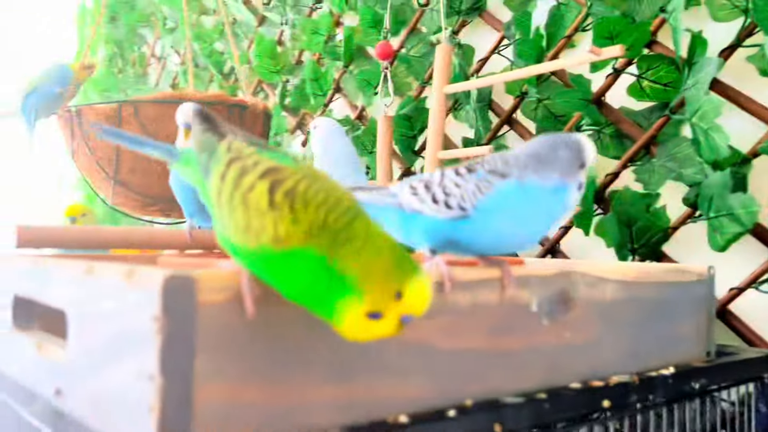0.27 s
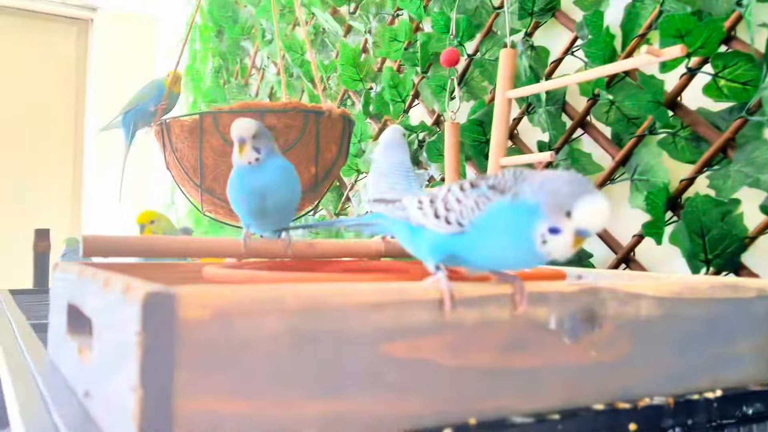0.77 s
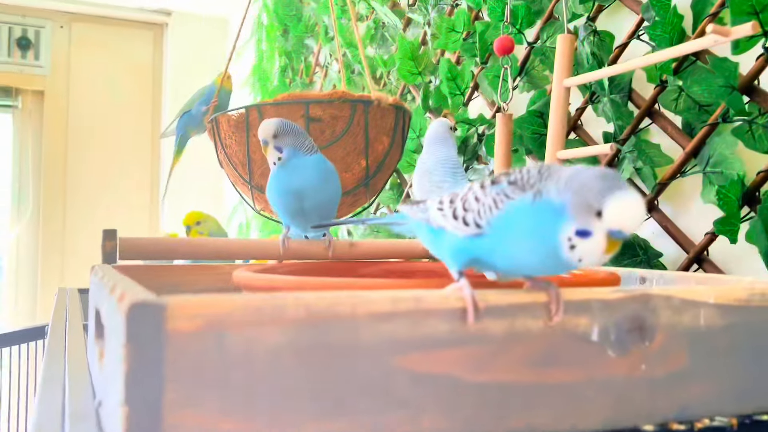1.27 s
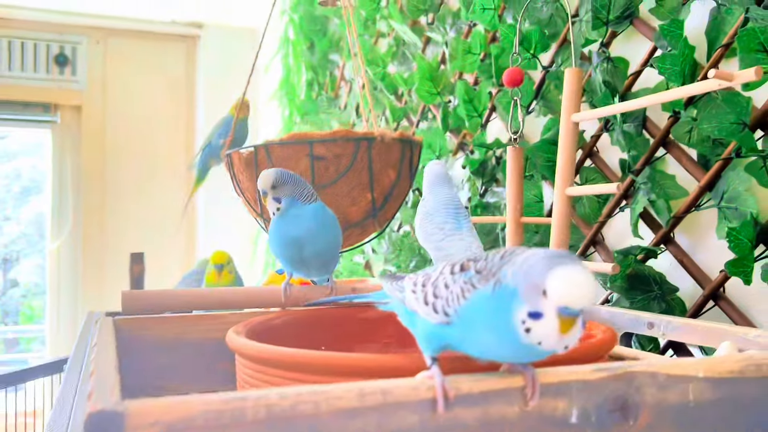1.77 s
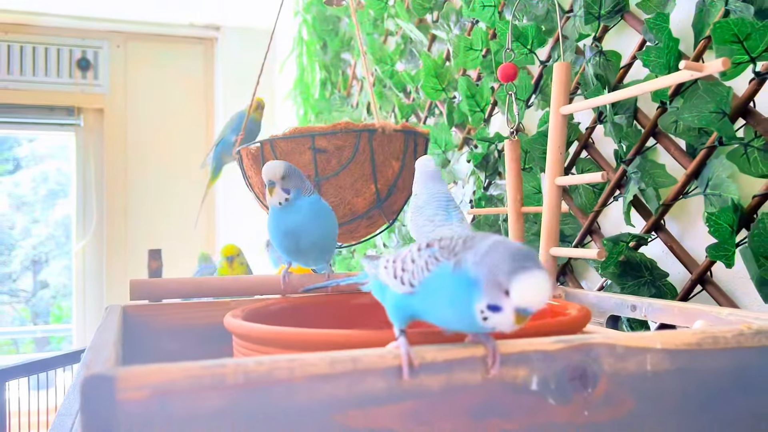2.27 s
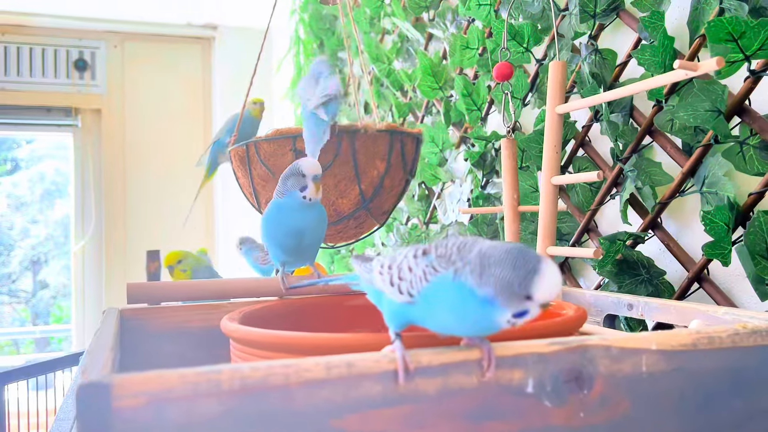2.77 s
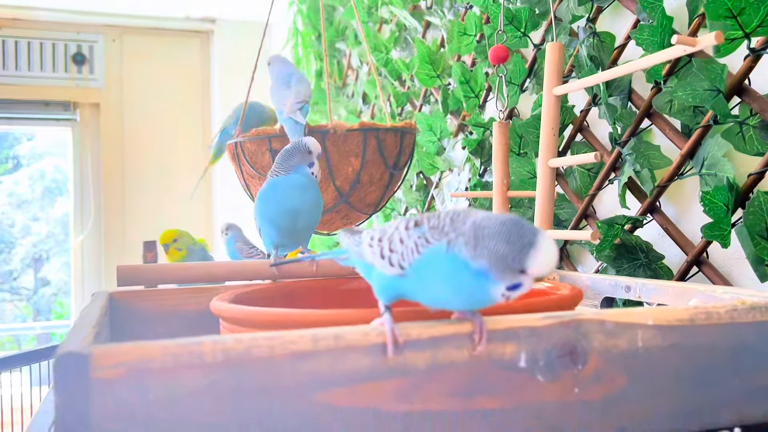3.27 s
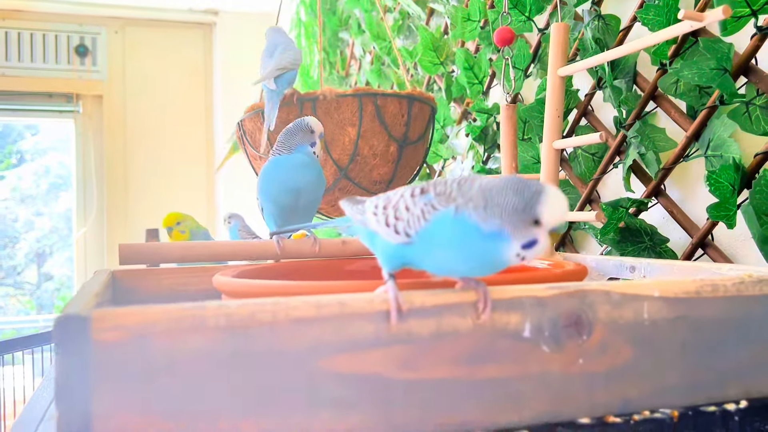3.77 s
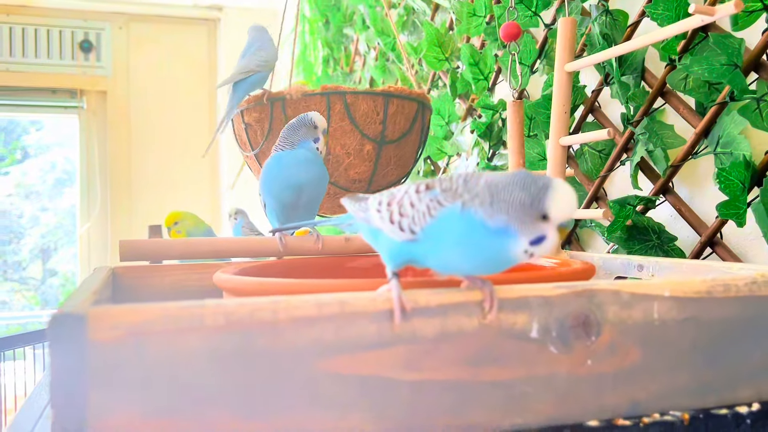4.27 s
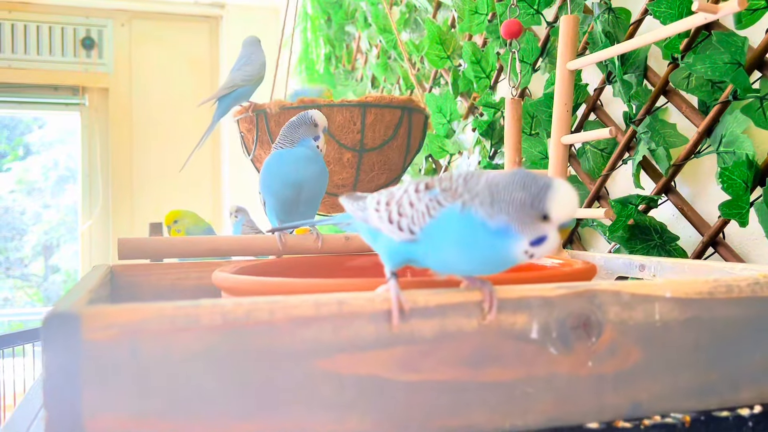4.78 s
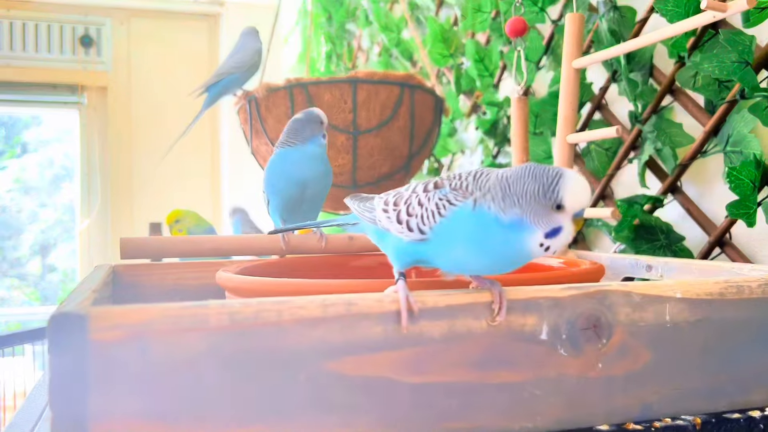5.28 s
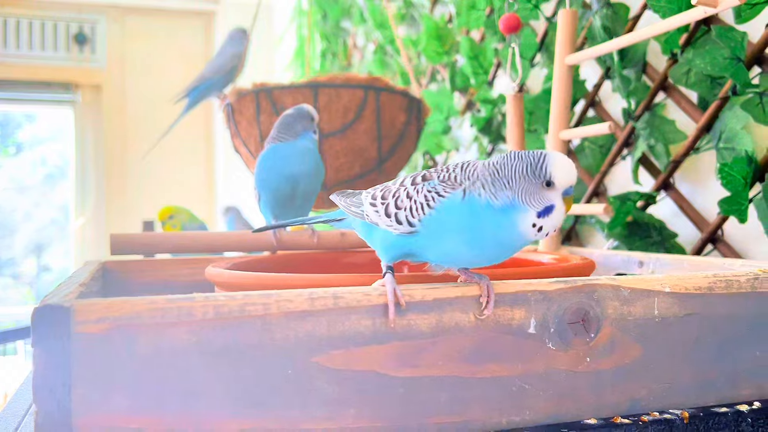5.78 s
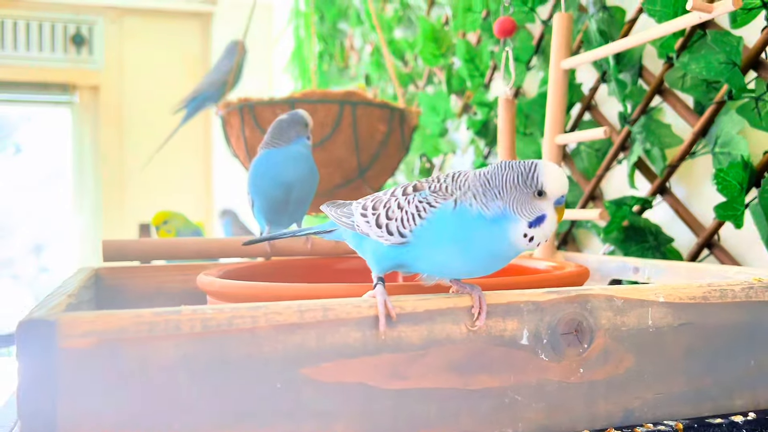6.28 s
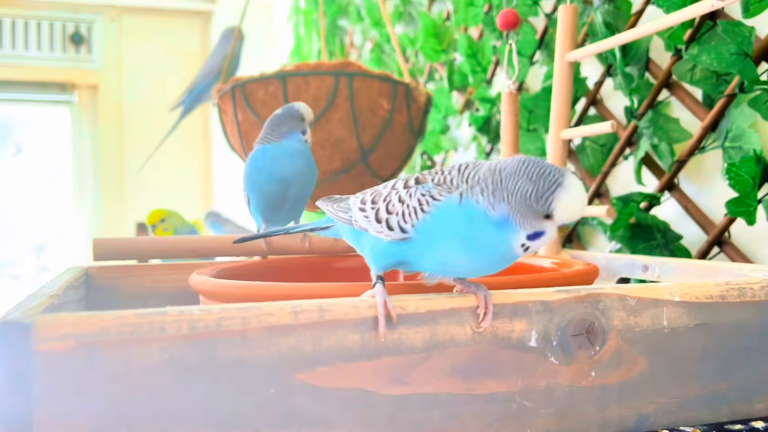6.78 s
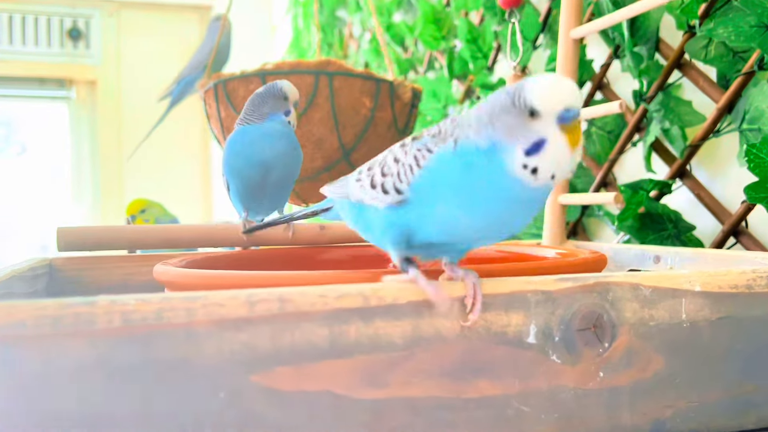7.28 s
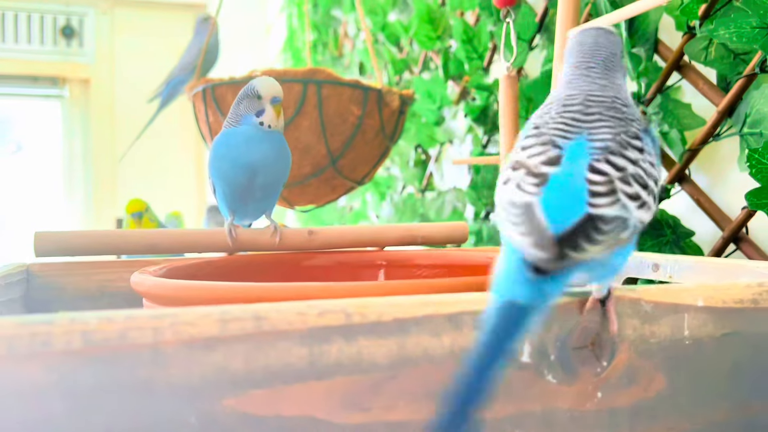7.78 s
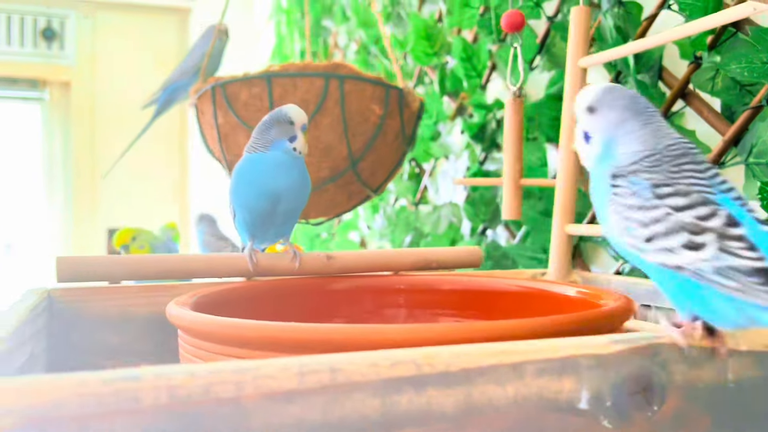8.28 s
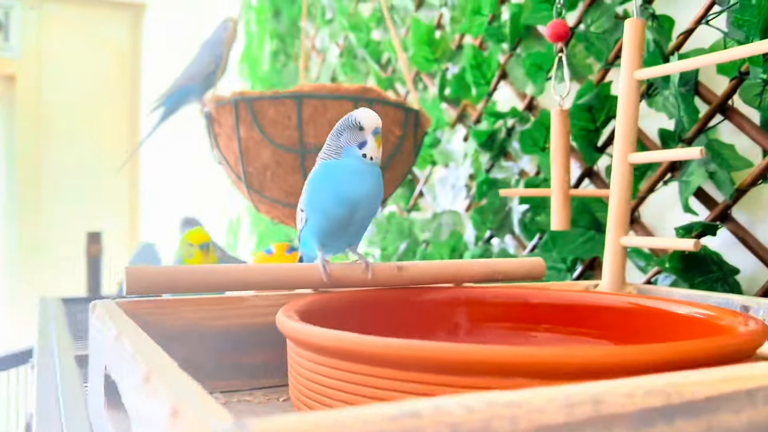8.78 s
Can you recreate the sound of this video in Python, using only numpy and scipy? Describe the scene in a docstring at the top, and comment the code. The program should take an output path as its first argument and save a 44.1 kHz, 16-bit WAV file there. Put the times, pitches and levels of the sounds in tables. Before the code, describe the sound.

Several budgerigars call close by in a small, lightly reverberant room. Quick peeps and a hoarse churr mix with grainy rustling gusts and low buffeting, which stop just before three seconds. Harsh rasps then stand out over sparser chirps and faint chatter, a low mutter joins from the middle, and the calls grow dense and loud toward the end. Soft ventilation rumble and a few perch taps lie underneath.

```python
"""Peeps, a hoarse churr and rustling gusts open the scene: a flock of budgerigars in a small room. Gliding sine
whistles with overtones alternate with harsh rasps, puffs of buzz rung through a throat. The gusts, early on,
are grainy noise in flaring bands; scuffs, taps and bumps are short coloured noise. Fainter strokes chatter
behind, and a low mutter joins later, over ventilation rumble and hum. The two channels differ in phase,
unevenly across frequency."""
import sys
import numpy as np
from scipy import signal
from scipy.fft import rfft, irfft
from scipy.io import wavfile
from scipy.ndimage import map_coordinates

SR = 44100
rng = np.random.default_rng(int(sys.argv[2]) if len(sys.argv) > 2 else 0)


def bounce(signal):
    """Save signal as a 16-bit WAV file at the path given by the first command-line argument."""
    frames = np.transpose(np.atleast_2d(signal))
    limited = np.clip(frames, -1, 1)
    pcm = np.round(limited * 32767).astype(np.int16)
    wavfile.write(sys.argv[1], SR, pcm)


N = 398663
TIME = np.arange(N) / SR
FREQS = np.arange(N // 2 + 1) * SR / N
SIDES = np.array([[1], [-1]])  # sign of a side signal at the left and right port


def amp(db):
    """Decibels to gain."""
    return 10 ** (np.asarray(db) / 20)


def unit(x):
    """Scale to rms 1."""
    return x / np.sqrt(np.mean(x ** 2) + 1e-18)


def add(track, s, x):
    """Mix a sound into a track at time s."""
    i = max(int(s * SR), 0)
    track[i:i + len(x)] += x[:max(N - i, 0)]


def colour(x, points, tilt=lambda hz: 0):
    """Filter by (Hz, dB) points plus an optional dB function of frequency; rms 1."""
    hz = np.maximum(np.fft.rfftfreq(len(x), 1 / SR), 1)
    at_hz, db = np.transpose(points)
    gain = amp(np.interp(np.log(hz), np.log(at_hz), db) + tilt(hz))
    return unit(irfft(rfft(x) * gain, len(x)))


def wander(size, rate_hz):
    """Smooth random motion with about rate_hz turns a second and spread near 1."""
    steps = np.arange(size) / SR * rate_hz
    points = rng.standard_normal(int(steps[-1]) + 3)
    return map_coordinates(points, [steps + 1], order=3, mode="nearest")


def swell(t, length, edge):
    """Envelope that opens around 0 and closes around length, each over edge seconds."""
    opening = np.clip(np.minimum(t, length - t) / edge + .5, 0, 1)
    return np.sin(np.pi / 2 * opening) ** 2


# Spectrum of the room rumble. Each row: frequency in Hz, relative level in dB.
RUMBLE_COLOUR = [(20, -13), (45, -6.5), (100, 0), (140, -10), (220, -9.5), (400, -19), (700, -24),
                 (2000, -15), (15000, -53.5)]


def room_tone(floor_db=-64, rumble_swell_db=2, hum_hz=72, hum_db=-70, side_db=-9):
    """Low ventilation rumble that swells a little, with a hum wavering in pitch and level."""
    mid, side = (colour(rng.standard_normal(N), RUMBLE_COLOUR) * amp(rumble_swell_db * wander(N, 27))
                 for _ in range(2))
    rumble = mid + amp(side_db) * side * SIDES
    hum_phase = 2 * np.pi * np.cumsum(hum_hz * (1 + 0.01 * wander(N, 11.0))) / SR
    hum = np.sqrt(2) * np.sin(hum_phase) * amp(2 * wander(N, 7.2))
    return amp(floor_db) * rumble + amp(hum_db) * hum


ROOM_T60_S, ROOM_TREBLE_T60_S = 0.33, 0.21


def room(x, early_db=-3, side_db=-3):
    """A few wall reflections, then a short diffuse tail whose treble dies first; partly alike at both ports."""
    t = np.arange(SR // 2) / SR
    split = signal.butter(2, 5000, fs=SR, output="sos")
    wet = []
    for _ in range(2):
        noise = rng.standard_normal(len(t))
        low = signal.sosfiltfilt(split, noise)
        tail = low * amp(-60 * t / ROOM_T60_S) + (noise - low) * amp(-60 * t / ROOM_TREBLE_T60_S)
        tail = tail * (t > .004)
        sparse = rng.standard_normal(len(t)) * (rng.random(len(t)) < .02)
        early = sparse * (t > .002) * np.exp(-t / 0.0038)
        response = unit(unit(tail) + amp(early_db) * unit(early)) / np.sqrt(len(t))
        wet.append(signal.fftconvolve(x, response)[:N])
    return wet[0] + amp(side_db) * wet[1] * SIDES


STIR_END_S, STIR_DB = 2.86, -55.5  # all rustling and buffeting ends here; a soft rustle lies under the gusts
# Rustling gusts. Each row: peak time in s, rise in s, fall in s, level in dB before the trim.
RUSTLES = [(0.2, 0.29, 0.99, -55), (0.625, 0.027, 0.19, -49.5), (1.04, 0.07, 0.12, -52.5),
           (1.215, 0.15, 0.085, -38), (1.41, 0.021, 0.096, -35.5), (1.79, 0.11, 0.14, -33),
           (1.92, 0.058, 0.023, -37), (2.025, 0.034, 0.027, -40.5), (2.087, 0.042, 0.048, -32),
           (2.3, 0.12, 0.037, -46.5), (2.54, 0.052, 0.082, -89)]
RUSTLE_TRIM_DB = -1
RUSTLE_DROP_DB = 17.5  # one rise before the peak and one fall after it
PULSE_HZ, PULSE_DB = 21.3, 3  # mean pulsing rate, level swing each way
# Spectrum of the rustle. Each row: frequency in Hz, relative level in dB.
RUSTLE_COLOUR = [(200, -25.5), (800, -13.5), (1700, 4.5), (3500, 7.5), (6500, 4.5), (9000, -6),
                 (16000, -15.5)]
# Low buffeting. Each row: time in s, level in dB.
BUFFETING = [(0.0, -59.5), (0.51, -60.5), (0.7, -43.5), (1.15, -54), (1.71, -51.5), (1.76, -67),
             (1.92, -39.5), (2.19, -73), (2.25, -55), (2.41, -83.5), (2.51, -64), (2.88, -80)]
# Spectrum of the buffeting. Each row: frequency in Hz, relative level in dB.
BUFFETING_COLOUR = [(20, -17), (75, 8), (130, -8.5), (430, -14), (700, -25), (1500, -43.5)]


def rustle(flutter_db=1, grain_db=2.0, band_db=3.5, side_db=-11):
    """Rustling gusts, as of a hand rubbing the phone: grainy noise in flaring bands, and low buffeting."""
    gusts = amp(STIR_DB)
    for s, rise, fall, db in RUSTLES:
        distance = np.maximum((s - TIME) / rise, (TIME - s) / fall)
        gusts = gusts + amp(db + RUSTLE_TRIM_DB - RUSTLE_DROP_DB * distance ** 2)
    flutter = amp(flutter_db * wander(N, 60)) * swell(TIME, STIR_END_S, 0.02)

    grains = rfft(rng.standard_normal(N) * amp(grain_db * wander(N, 700)))
    band = (FREQS // 1100).astype(int) % 6  # 1100 Hz strips dealt out to six groups
    flares = sum(irfft(grains * (band == k), N) * amp(band_db * wander(N, 90)) for k in range(6))
    rubbing = colour(flares, RUSTLE_COLOUR)
    pulse_phase = 2 * np.pi * np.cumsum(PULSE_HZ * (1 + 0.185 * wander(N, 8.03))) / SR
    pulses = amp(PULSE_DB * np.sin(pulse_phase))

    mid, side = (colour(rng.standard_normal(N), BUFFETING_COLOUR) for _ in range(2))
    buffeting = mid + amp(side_db) * side * SIDES
    buffeting_level = amp(np.interp(TIME, *np.transpose(BUFFETING)))
    return flutter * pulses * rubbing * gusts, flutter * buffeting * buffeting_level


# Dull scuffs against furniture. Each row: start in s, length in s, level in dB.
SCUFFS = [(0.544, 0.054, -54.5), (0.737, 0.178, -52.5)]
# Spectrum of a scuff. Each row: frequency in Hz, relative level in dB.
SCUFF_COLOUR = [(100, -6), (280, 2), (450, -0.5), (800, -2), (2500, -23)]


def scuffs(catch_db=5, edge=0.007):
    """Something drags over wood, catching and slipping: noise of uneven level."""
    out = np.zeros(N)
    for s, length, db in SCUFFS:
        t = np.arange(-edge / 2, length + edge, 1 / SR)
        slips = rng.standard_normal(len(t)) * amp(catch_db * wander(len(t), 194.0))
        add(out, s - edge / 2, colour(slips, SCUFF_COLOUR) * swell(t, length, edge) * amp(db))
    return out


def strikes(rows, points, t60, trim_db):
    """Blows on damped wood: coloured noise bursts that decay exponentially, 60 dB in t60 seconds."""
    out, t = np.zeros(N), np.arange(SR // 5) / SR
    for s, db in rows:
        burst = colour(rng.standard_normal(len(t)), points)
        add(out, s, burst * amp(db + trim_db - 60 * t / t60))
    return out


# Soft bumps on furniture. Each row: time in s, level in dB before trim.
BUMPS = [(2.547, -46)]
# Spectrum of a bump. Each row: frequency in Hz, relative level in dB.
BUMP_COLOUR = [(30, -23), (90, 5), (450, -2), (2000, -53)]


def bumps():
    """Soft, low blows on the furniture."""
    return strikes(BUMPS, BUMP_COLOUR, t60=0.064, trim_db=-10)


# Feet and beaks striking perches, and one wing clap at 2.304 s. Each row: time in s, level in dB before trim.
TAPS = [(.66, -31), (2.304, -27.5), (3.517, -43.5), (4.249, -36), (5.304, -35), (7.283, -36.5)]
# Spectrum of a tap. Each row: frequency in Hz, relative level in dB.
TAP_COLOUR = [(150, -15.5), (700, 2.5), (1300, 12.5), (4500, 12.5), (15000, -27.5)]


def taps():
    """Bright, quickly damped blows on wooden perches, and a clap of wings."""
    return strikes(TAPS, TAP_COLOUR, t60=0.037, trim_db=-2.0)


THROAT_HZ, OVERTONE_DB = 3200, -22  # overtone level of a note at the throat resonance
OVERTONE_DB_PER_OCTAVE, OVERTONE_MAX_DB = 16, 2


def overtone(hz):
    """Octave overtone in dB: the lower a note lies under the throat resonance, the stronger."""
    return min(OVERTONE_DB + OVERTONE_DB_PER_OCTAVE * np.log2(THROAT_HZ / hz), OVERTONE_MAX_DB)


STROKE_S = 0.013  # length of a warble stroke
NOTE_EDGE_S = .008
HOARSE_PER_OCTAVE = .5
# Spectrum of rasps and of the scratch in whistles. Each row: frequency in Hz, relative level in dB.
RASP_COLOUR = [(200, -50.5), (600, -43.5), (1100, -21), (1800, -15.5), (2500, -4.5), (3500, 1.5), (4900, 3),
               (5600, 0.5), (7000, 0.5), (8300, -5), (11000, -17.5), (15500, -11)]


def whistle(length, start_hz, mid_hz, end_hz, overtone_db, jitter=0.023, flutter_db=4.0,
            third_db=-14, fourth_db=-20, hoarse=0.013, scratch_db=-30):
    """The syrinx membrane sweeps through an arc of pitch, trembling in pitch and strength."""
    t = np.arange(-NOTE_EDGE_S / 2, length + NOTE_EDGE_S / 2, 1 / SR)
    progress = np.clip(t / length, 0, 1)
    hz = np.polyval(np.polyfit([0, .5, 1], [start_hz, mid_hz, end_hz], 2), progress)
    hz = hz * (1 + jitter * wander(len(t), 440))
    phase = 2 * np.pi * np.cumsum(hz) / SR
    tone = np.sin(phase)
    # third and fourth partials are set relative to the second
    for k, db in enumerate([0, third_db, fourth_db], 2):
        tone += amp(overtone_db + db) * np.sin(k * phase) * (k * hz < SR / 2)
    # fast glides break up: irregular beating throws sidebands round the tone
    glide = abs(np.log2(end_hz / start_hz)) * min(STROKE_S / length, 1)
    tone = tone * (1 + (hoarse + HOARSE_PER_OCTAVE * glide) * wander(len(t), 1600))
    scratch = amp(scratch_db) * colour(rng.standard_normal(len(t)), RASP_COLOUR)
    flutter = unit(amp(flutter_db * wander(len(t), 244.3)))
    return (unit(tone) + scratch) * flutter * swell(t, length, NOTE_EDGE_S)


def far_chatter(notes, count=330, far_db=-48, spread_db=2, answer_s=0.032):
    """Birds further back answer each syllable with quick, mostly falling strokes."""
    out = np.zeros(N)
    for i, (long, high, fall, arch) in enumerate(rng.random((count, 4))):
        s, *_, db, _ = notes[i % len(notes)]
        hz = 2000 + 1600 * high
        end_hz = hz * (.55 + .55 * fall)
        mid_hz = end_hz + (hz - end_hz) * arch
        note = whistle(.01 + .016 * long, hz, mid_hz, end_hz, overtone(hz))
        # syllables under -40 dB get quieter answers
        level_db = far_db + min(db + 40.0, 0) + spread_db * rng.standard_normal()
        add(out, s + answer_s * rng.uniform(0, 1.8), note * amp(level_db))
    return out


MUTTER_FROM_S, MUTTER_HZ = 4, 1730  # start, centre of the pitch range
MUTTER_MIN_DB, MUTTER_RANGE_DB = -60.5, 6


def mutter(count=55, spread_octaves=0.195, glide_octaves=0.33, shortest_s=0.023, longest_s=0.024):
    """Soft low notes, mostly sinking, that follow each other closely to the end."""
    out = np.zeros(N)
    for i, (late, long, high, fall, loud) in enumerate(rng.random((count, 5))):
        hz = MUTTER_HZ * 2 ** (spread_octaves * (2 * high - 1))
        step = 2 ** (-glide_octaves * (fall - .2))
        length = shortest_s + (longest_s - shortest_s) * long
        note = whistle(length, hz / step, hz, hz * step, overtone(hz), third_db=-8, fourth_db=-21)
        s = MUTTER_FROM_S + (TIME[-1] - MUTTER_FROM_S) * (i + late) / count
        add(out, s, note * amp(MUTTER_MIN_DB + MUTTER_RANGE_DB * loud))
    return out


# Hoarse notes. Each row: start in s, length in s, pitch in Hz, level in dB.
CHURRS = [(0.191, 0.039, 2815, -36.5), (1.275, 0.096, 2897, -36.5), (2.472, 0.065, 2585, -46.5),
          (5.817, 0.074, 3200, -36), (6.007, 0.062, 2956, -49), (6.393, .075, 3015, -42.5),
          (7.088, 0.097, 3036, -43.5), (8.553, 0.069, 2750, -42)]
CHURR_HOARSE, CHURR_SHAKE = .5, .09  # beating depth, pitch jitter as a share


def churrs(half_db=-10, sag=0.0502):
    """Hoarse whistles that shake quickly in pitch, with a growl an octave below."""
    calls = []
    for s, length, hz, db in CHURRS:
        high, low = (whistle(length, f * (1 + sag), f, f * (1 - sag), overtone(f),
                             jitter=CHURR_SHAKE, hoarse=CHURR_HOARSE) for f in (hz, hz / 2))
        calls.append((s, (high + amp(half_db) * low) * amp(db)))
    return calls


# Nasal notes. Each row: start in s, length in s, start pitch in Hz, end pitch in Hz, level in dB,
# then second, third and fourth partial in dB relative to the first.
WHINES = [(6.318, .026, 2100, 1750, -52, -7, -17, -14), (7.531, 0.041, 2444, 3017, -40.5, -15, -13.5, -30),
          (8.466, .09, 1962, 1193, -41, 5, -4.5, -12), (8.557, 0.046, 1158, 837, -51, 19, 12, 12)]


def whines():
    """Nasal glides with a full stack of overtones."""
    calls = []
    for s, length, start_hz, end_hz, db, second, third, fourth in WHINES:
        mid_hz = np.sqrt(start_hz * end_hz)
        note = whistle(length, start_hz, mid_hz, end_hz, second,
                       third_db=third - second, fourth_db=fourth - second)
        calls.append((s, note * amp(db)))
    return calls


RASP_BREATH_DB, RASP_JITTER = -3, .035  # breath relative to voice, pitch jitter as a share


def rasp(length, throat_db, shrill_db, ring_hz, voice_hz=940, pulse_hz=165, scatter=0.12, puff_s=0.0026,
         edge=.007, arch_db=7, ceiling=1.7, ring_db=6, ring_width_hz=350, uneven_db=2):
    """A shaky buzzing voice and some air, chopped into uneven puffs and rung through the throat."""
    t = np.arange(-edge / 2, length + 2 * edge, 1 / SR)
    cycle = np.cumsum(pulse_hz * (1 + scatter * wander(len(t), 170)) * (t >= 0)) / SR
    opening = cycle.astype(int)
    opened_s = np.maximum(t[np.searchsorted(opening, opening)], 0)
    age = np.maximum(t - opened_s, 0)
    puff_level = amp(uneven_db * rng.standard_normal(64))[opening % 64]
    puffs = (1 - np.exp(-age / .0007)) * np.exp(-age / puff_s) * puff_level
    # air pressure builds to the middle of the call and falls away
    pressure = swell(t, length, edge) * amp(arch_db * np.sin(np.pi * t / length))
    phase = 2 * np.pi * np.cumsum(voice_hz * (1 + RASP_JITTER * wander(len(t), 700))) / SR
    voice = unit(sum(np.sin(k * phase + 2 * np.pi * rng.random()) for k in range(1, 17)))
    breath = amp(RASP_BREATH_DB) * rng.standard_normal(len(t))
    source = np.tanh(unit(puffs * (voice + breath)) / ceiling) * pressure

    def beak(hz):
        """The beak opening trades the low throat resonance against the top; one resonance stands out."""
        throat = (throat_db + 9.5) / (1 + (hz / 2600) ** 6)
        shrill = (shrill_db + 10.0) / (1 + (5500 / hz) ** 8)
        ring = ring_db / (1 + ((hz - ring_hz) / ring_width_hz) ** 2)
        return throat + shrill + ring

    return colour(source, RASP_COLOUR, beak)


# Harsh calls. Each row: start in s, length in s, level in dB, low throat resonance in dB before offset,
# shrillness in dB before offset, sharpest resonance in Hz.
RASPS = [(0.398, 0.065, -31.5, -1.5, -3, 4370), (0.921, 0.048, -34.5, 0.5, -11, 4000),
         (1.614, 0.024, -39, -4, -6, 4540), (2.221, 0.044, -28.5, -4.5, -2.5, 4380),
         (3.68, 0.044, -25, -6, -5, 4970), (3.817, 0.022, -34.5, 1.5, -6, 4190),
         (3.834, 0.054, -29.5, -10.5, -8, 6100), (4.181, 0.051, -45, 9.5, -17, 3670),
         (4.86, 0.046, -36, -1, -14, 3330), (4.904, 0.038, -32.5, -3.5, -19.5, 4410),
         (5.245, 0.049, -49, 9.5, -33, 3300), (5.818, 0.093, -43.5, -2, -20, 3450),
         (6.576, 0.054, -23, -10, -7, 3750), (6.801, 0.036, -36, -1, -5, 7000),
         (6.824, 0.029, -30, -7, -3.5, 7100), (7.78, 0.093, -41, 10, -19, 3630),
         (7.966, 0.036, -53.5, 5, -26, 3650), (8.228, 0.041, -23, -6, -2, 4850),
         (8.262, 0.043, -23, -8, -6.5, 4850), (8.304, 0.043, -24, -9, -13, 4360),
         (8.341, 0.034, -29.5, 4, -18, 3800), (8.935, 0.046, -54, 9, -3, 4220)]


def rasps():
    """All harsh calls, each with its own beak opening."""
    return [(s, rasp(length, throat_db, shrill_db, ring_hz) * amp(db))
            for s, length, db, throat_db, shrill_db, ring_hz in RASPS]


# Held whistles. Each row: start in s, length in s, pitch in Hz, level in dB, octave overtone in relative dB.
PEEPS = [(0.035, 0.029, 3390, -38.5, -32), (0.093, 0.022, 2422, -26, -14), (0.149, 0.037, 2870, -30, -9.5),
         (0.344, 0.028, 3380, -41, -21), (1.032, 0.031, 3390, -44.5, -12), (1.232, .02, 3300, -29.5, -15),
         (1.252, 0.018, 3440, -33.5, -23), (1.299, 0.017, 3190, -34, -36), (1.361, 0.041, 3200, -35.5, -39),
         (1.691, 0.03, 3257, -27.5, -45), (1.763, 0.031, 3070, -30, -6), (2.003, 0.062, 3990, -40.5, -20),
         (2.109, 0.037, 3400, -38, -23), (2.438, 0.014, 3424, -39.5, -41), (2.543, 0.013, 3430, -41, -13),
         (2.703, 0.08, 2663, -46.5, -32.5), (2.946, 0.041, 2314, -37.5, 3), (3.2, 0.019, 3200, -49, -19),
         (4.393, 0.027, 3500, -45.5, -21), (4.539, 0.0073, 3290, -43.5, -41), (5.114, 0.03, 3503, -47, -4),
         (5.395, 0.017, 3440, -38, -27), (5.565, 0.014, 2900, -42.5, -12), (5.61, 0.036, 3610, -33, -31),
         (5.669, 0.055, 3680, -26.5, -25.5), (5.727, 0.016, 3486, -28, -28), (5.825, 0.02, 3560, -24, -22),
         (6.126, 0.019, 3023, -33, -29), (6.253, 0.0096, 3140, -52.5, -18), (6.4, 0.033, 2997, -35, -37),
         (6.83, 0.016, 3590, -21, 9), (6.989, 0.027, 3230, -38, -32), (7.062, 0.024, 3490, -31.5, -38),
         (7.142, 0.016, 3575, -31.5, -32), (7.335, 0.033, 2840, -48, -28), (7.394, 0.029, 3420, -40, -38.5),
         (7.97, 0.024, 3725, -47, -23), (8.022, 0.017, 3616, -39.5, -25), (8.584, 0.031, 2494, -42, -1),
         (8.627, 0.028, 3078, -30.5, -14.5), (8.75, 0.022, 3420, -40, -33)]
PEEP_RISE, PEEP_DROOP = 0.027, 0.064  # shares of its pitch by which a peep starts and ends low
# Gliding notes. Each row: start in s, length in s, start pitch in Hz, end pitch in Hz, level in dB.
SLURS = [(0.855, 0.019, 2340, 3030, -38.5), (1.198, 0.013, 2210, 1400, -43),
         (1.313, 0.022, 1920, 1380, -42.5), (1.368, 0.033, 1525, 1290, -49.5),
         (1.715, 0.0092, 4320, 3860, -31.5), (1.728, .026, 4345, 3530, -21.5),
         (2.569, 0.036, 2570, 3240, -33), (2.606, 0.039, 1635, 1400, -48), (2.904, 0.012, 3690, 3200, -33),
         (2.912, 0.0099, 3173, 3500, -24.5), (2.929, 0.017, 3580, 4000, -20.5),
         (3.215, 0.017, 1530, 3000, -61), (3.236, 0.016, 2950, 1514, -53),
         (3.262, 0.021, 3200, 1220, -48.5), (3.315, 0.012, 2190, 1087, -64), (3.93, 0.028, 3660, 3150, -47),
         (3.998, 0.019, 1690, 1490, -77), (4.343, 0.015, 3400, 4160, -50),
         (4.447, 0.021, 1720, 1600, -60.5), (4.56, 0.012, 1610, 1910, -56), (4.598, 0.025, 3576, 1295, -50),
         (4.635, 0.033, 1390, 1630, -63), (4.729, 0.052, 1640, 1920, -63.5),
         (4.8, 0.061, 1994, 1840, -60.5), (5.094, 0.012, 1344, 1150, -43), (5.186, 0.032, 1210, 1044, -49),
         (5.409, 0.016, 3080, 1314, -54), (5.474, 0.019, 3430, 1970, -44), (5.505, 0.017, 1410, 997, -47.5),
         (5.629, 0.014, 2925, 1500, -44), (5.745, 0.016, 1460, 1450, -48),
         (5.797, 0.017, 2665, 3360, -31.5), (5.814, 0.01, 3010, 1670, -34.5),
         (5.842, 0.011, 3460, 1680, -44), (5.847, 0.0243, 2740, 3387, -30), (5.871, 0.047, 1924, 1080, -50),
         (6.051, 0.019, 3370, 2330, -42), (6.069, 0.0079, 2480, 1680, -48),
         (6.087, 0.02, 2390, 2780, -50.5), (6.22, 0.019, 2420, 1820, -60), (6.342, 0.028, 3860, 2570, -40),
         (6.373, 0.015, 3086, 2105, -37), (6.441, 0.013, 3296, 2760, -34.5),
         (6.448, 0.026, 1756, 1620, -48.5), (6.759, 0.043, 945, 1342, -47.5),
         (7.015, 0.041, 4325, 3940, -41), (7.04, 0.0093, 1495, 1060, -47),
         (7.158, 0.011, 3645, 2440, -33.5), (7.189, 0.029, 3120, 1810, -54),
         (7.365, 0.011, 2456, 1550, -48), (7.428, 0.01, 3200, 1720, -42), (7.478, 0.017, 1975, 1227, -46),
         (7.508, 0.018, 3660, 3140, -36), (7.967, 0.048, 2000, 1730, -54), (8.005, .012, 5020, 3900, -47),
         (8.037, 0.0057, 3360, 2610, -49), (8.059, 0.013, 2560, 3080, -44.5),
         (8.079, 0.031, 1464, 1164, -48), (8.793, 0.016, 2670, 1540, -48),
         (8.812, 0.016, 3850, 3020, -49.5), (8.824, 0.031, 1390, 2030, -52),
         (8.862, 0.0075, 4270, 3350, -44), (8.954, 0.076, 2320, 3500, -44.5)]
# Runs of falling strokes. Each row: start in s, length in s, top pitch in Hz, level in dB at the start.
WARBLES = [(0.074, .055, 3534, -35), (2.552, .1, 3310, -45), (5.439, .09, 3310, -47),
           (6.97, .085, 2785, -45), (7.086, .085, 3576, -44.5), (8.823, .085, 2954, -49)]
STROKE_EVERY_S = 0.024
STROKE_MIDDLE, STROKE_END = .74, 0.528  # shares of the stroke's top pitch
WARBLE_SAG_HZ_PER_S, WARBLE_FADE_DB_PER_S = 4310, 56.5  # a run sinks and fades as the air runs out


def syllables(uneven_s=0.0028, pitch_scatter=0.07):
    """Peeps, slurs and warble strokes as (s, length s, start Hz, middle Hz, end Hz, dB, overtone dB)."""
    notes = []
    for s, length, hz, db, overtone_db in PEEPS:
        notes.append((s, length, hz * (1 - PEEP_RISE), hz, hz * (1 - PEEP_DROOP), db, overtone_db))
    for s, length, start_hz, end_hz, db in SLURS:
        hz = np.sqrt(start_hz * end_hz)
        notes.append((s, length, start_hz, hz, end_hz, db, overtone(hz)))
    for s, length, top_hz, db in WARBLES:
        for t in np.arange(0, length, STROKE_EVERY_S):
            late, sharp = rng.standard_normal(2)
            hz = (top_hz - WARBLE_SAG_HZ_PER_S * t) * (1 + pitch_scatter * sharp)
            notes.append((s + t + uneven_s * late, STROKE_S, hz, hz * STROKE_MIDDLE, hz * STROKE_END,
                          db - WARBLE_FADE_DB_PER_S * t, overtone(hz)))
    return notes


def flock(notes, note_wet_db=-6.5, rasp_wet_db=-8):
    """Direct sound and room feed of all near calls."""
    direct, feed = np.zeros(N), np.zeros(N)
    whistles = [(s, whistle(length, start_hz, mid_hz, end_hz, overtone_db) * amp(db))
                for s, length, start_hz, mid_hz, end_hz, db, overtone_db in notes]
    for s, note in whistles + churrs() + whines():
        add(direct, s - NOTE_EDGE_S / 2, note)
        add(feed, s - NOTE_EDGE_S / 2, note * amp(note_wet_db))
    for s, call in rasps():
        add(direct, s - .002, call)
        add(feed, s - .002, call * amp(rasp_wet_db))
    return direct, feed


def scene():
    """Calls, rustling, scuffs, taps and bumps in the room."""
    notes = syllables()
    calls, feed = flock(notes)
    rubbing, buffeting = rustle()
    small = rubbing + scuffs() + taps() + bumps()
    far = far_chatter(notes) + mutter()
    reverb = room(feed + amp(-5) * small + amp(-9.0) * far)
    return calls + small + buffeting + far + reverb + room_tone()


# Phase lead of the left channel over the right. Each row: frequency in Hz, lead in radians.
PORT_LEAD = [(0, 0), (1300, -.4), (2450, 1.8), (3950, .5), (4900, 1.3), (5400, 3.1), (7100, 6.2),
             (8500, 6.4), (9300, 9.3), (10700, 9.5), (11400, 12.4), (13100, 12.6), (14300, 15.5)]
TOP_HZ = 15700


def record(dry):
    """Each port gets half the phase difference, with opposite sign; a steep low-pass cuts the top."""
    lead = np.exp(.5j * np.interp(FREQS, *np.transpose(PORT_LEAD)))
    pair = irfft(rfft(dry) * np.array([lead, lead.conj()]), N)
    low_pass = signal.ellip(10, .2, 70, TOP_HZ, fs=SR, output="sos")
    return signal.sosfilt(low_pass, pair)


dry = scene()
out = record(dry)
bounce(out)
```